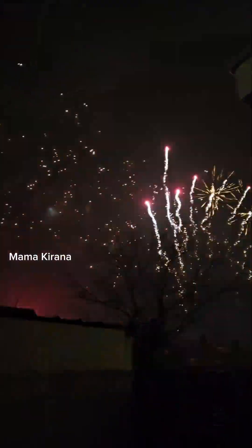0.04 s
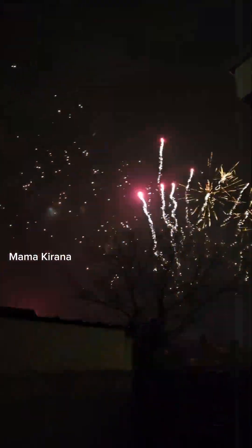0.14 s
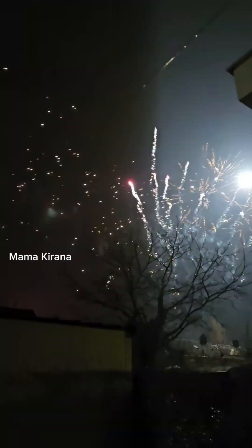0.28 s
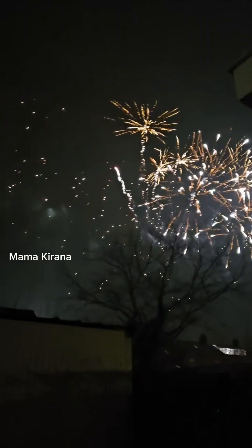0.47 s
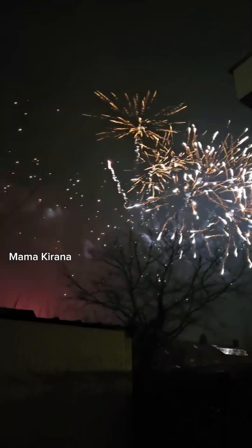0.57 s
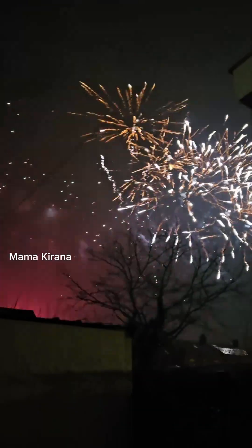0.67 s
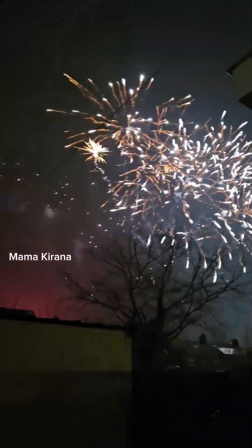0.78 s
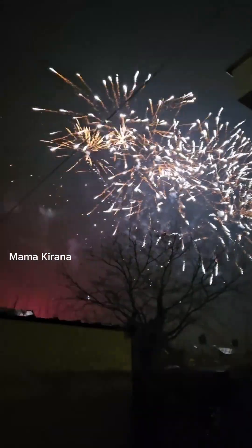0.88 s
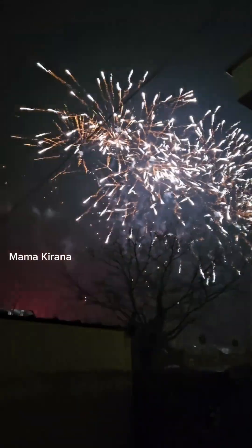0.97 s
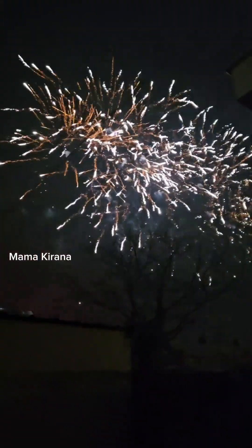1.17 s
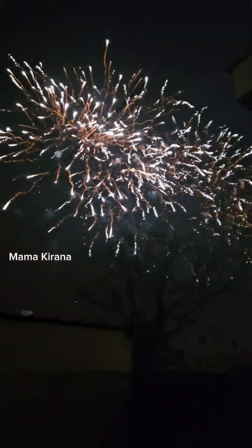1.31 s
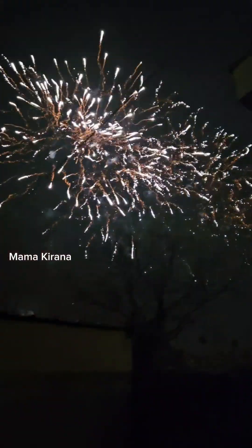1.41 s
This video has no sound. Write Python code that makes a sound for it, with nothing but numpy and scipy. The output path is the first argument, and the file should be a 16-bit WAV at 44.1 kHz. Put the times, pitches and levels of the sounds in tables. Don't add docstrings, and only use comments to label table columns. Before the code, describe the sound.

Fireworks burst over houses at night. An earlier shell's echo rolls over a low distant rumble until about 0.2 s, when sharp bangs with short hissy cracks pile up rapidly to 0.7 s, with low thuds and hard wall slaps. After a brief gap of rolling echo, two more bangs crack near 0.96 and 1.07 s, then the reverberation fades. Stereo phone, peaks softly limited.

```python
import sys
import numpy as np
from scipy import signal
from scipy.fft import rfft, irfft, next_fast_len
from scipy.io import wavfile
from scipy.ndimage import uniform_filter1d, map_coordinates

SR = 44100
rng = np.random.default_rng(int(sys.argv[2]) if len(sys.argv) > 2 else 0)


def ratio_of_db(decibels):
    return 10 ** (np.asarray(decibels, float) / 20)


def wrap_up_sound(samples):
    columns = np.atleast_2d(samples).T
    tamed = np.clip(columns, -1, 1)
    steps = np.round(tamed * 32767).astype(np.int16)
    wavfile.write(sys.argv[1], SR, steps)


N = 63945
LEAD = SR // 2

# start in seconds, blast in dB, blast length in ms, crack in dB, echo in dB.
SHELL_BURSTS = [(-.2, 3.5, 0.77, -18, -5), (0.2046, 3, 0.51, -22.5, 1), (0.2326, 1.5, 0.93, -18.5, -1.5),
                (0.313, -9.5, 0.92, -23, -1.5), (0.3389, 7, 0.35, -17.5, -10.5),
                (0.4285, -5, 1.04, -23, -1.5), (0.5116, -11.5, 0.95, -28, -3),
                (0.5859, -1, 0.99, -12, -3.5), (0.6788, -0.5, 0.84, -17.5, -1.5),
                (0.9604, -1, 0.86, -18.5, -0.5), (1.0714, 1, 0.66, -17, -2), (1.418, -24.5, 1.1, -58.5, 10)]


def shells(mix):
    edge_db = 2.5
    for start_s, blast_db, length_ms, crack_db, echo_db in SHELL_BURSTS:
        add(mix, start_s, blast(blast_db, length_ms) + crack(crack_db + edge_db))
        add(mix, start_s, ratio_of_db(echo_db) * echoes(blast_db, length_ms, crack_db))


def blast(db, length_ms):
    right_late, rise_share, damp_ms = 5, 0.31, 1
    puff_db, puff_ms = -17.5, 1.08
    late = np.array([[0], [right_late]])
    t_ms = np.maximum(np.arange(1024) - late, 0) / SR * 1000
    u = t_ms / abs(length_ms)
    w = t_ms / puff_ms
    swing = 1.56 * np.sin(np.pi * u) * np.exp(-u * damp_ms / abs(length_ms))
    puff = ratio_of_db(puff_db) * (1 - w) * np.exp(-w)
    rise = 1 - np.exp(-(u / rise_share) ** 2)
    return ratio_of_db(db) * (swing + puff) * rise


# frequency in Hz, level in dB per Hz.
CRACK_COLOUR = [(700, -2.5), (1500, 2.5), (3000, -1.5), (5000, 1.5), (8000, -1), (12000, -7.5),
                (16000, -15.5)]


def crack(db, smear=1, dull_hz=40000):
    rise_s, t60_s = 0.00034, 0.0079
    t = np.arange(1024) / SR / smear
    noise = rng.standard_normal((2, len(t)))
    hiss = filtered(noise, lambda hz: ratio_of_db(along(CRACK_COLOUR, hz)) / (1 + (hz / dull_hz) ** 2))
    envelope = ratio_of_db(-60 * t / t60_s) * (1 - np.exp(-t / rise_s))
    return 1.73 * ratio_of_db(db) * hiss / hiss.std() * envelope


# frequency in Hz, t60 in seconds.
SCATTER_T60 = [(100, 0.41), (500, .1), (2000, 0.068), (8000, 0.19)]
# frequency in Hz, t60 in seconds.
ROLL_T60 = [(100, 1.32), (500, 1.15), (2000, 0.33), (5000, 0.57), (12000, 0.47)]
# frequency in Hz, level in dB.
TILE_RATTLE = [(800, -34), (1400, -15), (2200, 5.5), (2700, -23), (4000, -38)]


def echoes(blast_db, length_ms, crack_db):
    scatter_db, roll_db = 2.5, -3.5
    crack_scatter_db, crack_roll_db = -2.5, -6.5
    rattle_db = -0.5
    near = tail(SCATTER_T60, delay_s=0.002, hold_s=0.02, n=SR // 4)
    street = tail(ROLL_T60, delay_s=0.042, hold_s=0, n=SR)
    dull = ratio_of_db(scatter_db) * near + ratio_of_db(roll_db) * street
    bright = ratio_of_db(crack_scatter_db) * near + ratio_of_db(crack_roll_db) * street
    boom = signal.fftconvolve(blast(blast_db, length_ms), dull, axes=1)[:, :SR]
    hiss = filtered(bright, lambda hz: 20 * ratio_of_db(crack_db + along(CRACK_COLOUR, hz)))
    rattle = filtered(near, lambda hz: ratio_of_db(blast_db + rattle_db + along(TILE_RATTLE, hz)))
    return boom + hiss + rattle


# frequency in Hz, level in dB.
WALL_COLOUR = [(60, 10), (250, 1.5), (550, 3), (900, -4.5), (1400, 8.5), (3000, 3), (6000, 2.5),
               (15000, -0.5)]


def tail(t60s, delay_s, hold_s, n):
    clumps_db = 1.58
    hz, t, z = signal.stft(stereo_noise(n, WALL_COLOUR), SR, nperseg=256)
    clumps = uniform_filter1d(rng.standard_normal(z.shape[1:]), size=25, axis=0) * 5
    fall_db = -60 * np.maximum(t - hold_s, 0) / np.maximum(along(t60s, hz), .02)[:, None]
    x = signal.istft(z * ratio_of_db(fall_db + clumps_db * clumps), SR, nperseg=256)[1][:, :n]
    x = x * (1 - np.exp(-(np.arange(n) / SR / delay_s) ** 2))
    energy = np.sum(x ** 2, 1)
    return np.pad(x, ((0, 0), (0, SR - n))) / np.sqrt(np.mean(energy))


# start in seconds, blast in dB, blast length in ms, crack in dB, left over right in dB.
PRESSURE_SLAPS = [(0.2204, -2, .4, -18, 2), (0.4312, -6, 0.81, -21, -19), (.436, -2, 0.52, -22, -12),
                  (.521, -15, 1.3, -25, 7.5), (.592, -10, 0.79, -33, -23), (0.603, -5, 0.78, -23, 3),
                  (.613, 6, 0.66, -15, 1.5), (0.751, -45, 1.8, -41, 0), (1.033, -8, 1.7, -70, 3),
                  (1.135, -25, 0.91, -27, 10), (1.146, -9, 1.55, -30.5, 3.5)]
# start in seconds, blast in dB, blast length in ms, crack in dB, left over right in dB.
SUCTION_SLAPS = [
    (.2465, -11, 0.88, -17.5, 4),
    (0.291, -7, 1.63, -20.5, 1),
    (0.446, -15, 1.44, -23, 0),
    (.627, -11.5, 1.7, -23, 1),
    (0.6931, -10.5, 1.1, -36, -4),
]


def wall_slaps(mix):
    for sign, table in ((0.45, PRESSURE_SLAPS), (-1.18, SUCTION_SLAPS)):
        for start_s, blast_db, length_ms, crack_db, pan_db in table:
            pan = ratio_of_db(np.array([[pan_db / 2], [-pan_db / 2]]))
            slap = sign * blast(blast_db, length_ms) + crack(crack_db, smear=1.82, dull_hz=8800)
            add(mix, start_s, slap * pan)


# start in seconds, level in dB, pitch in Hz, t60 in seconds.
THUD_HITS = [
    (0.3, -15, 86, 0.047),
    (0.53, 3, 60, 0.037),
    (0.74, -10, 49, 0.14),
    (0.21, -18.5, 246, 0.087),
    (.234, -16.5, 242, 0.085),
    (.52, -23, 185, 0.077),
    (.4283, -11.5, 513, 0.025),
    (0.962, -15.5, 230, 0.038),
    (1.074, -19, 480, 0.034),
]


def thuds(mix):
    t = np.arange(SR // 5) / SR
    for start_s, db, hz, t60_s in THUD_HITS:
        decay = ratio_of_db(db - 60 * t / t60_s)
        ring = (1 - np.exp(-hz * t)) * np.sin(2 * np.pi * hz * t)
        add(mix, start_s, 4 * (decay * ring)[None])


# time in seconds, level in dB.
FAR_SWELL = [
    (0, -23.5),
    (.1, -23.5),
    (.19, -25.5),
    (0.298, -24),
    (.47, -21.5),
    (.8, -26),
    (.95, -27.5),
    (1.2, -30),
    (1.36, -28),
    (1.45, -30.5),
]
# frequency in Hz, level in dB per Hz.
RUMBLE_COLOUR = [(30, 7), (55, 15), (120, -10.5), (250, -1), (600, -14.5), (900, -20.5), (1300, -15),
                 (3000, -29), (8000, -51)]


def far_fireworks():
    s, level_db = np.transpose(FAR_SWELL)
    noise = stereo_noise(N, RUMBLE_COLOUR + [(12000, -120)])
    lumps_db = .8 * wobble(45)
    swell_db = 1 + np.interp(np.arange(N) / SR, s, level_db)
    return noise / noise.std() * ratio_of_db(swell_db + lumps_db)


def wobble(rate):
    knots = rng.standard_normal(N // 500 + 4)
    return map_coordinates(knots, [np.arange(N) * rate / SR])


# frequency in Hz, left-right likeness from 0 to 1.
LIKENESS = [(40, 0.97), (120, 1), (250, 0.9), (600, 0.57), (1200, 0.018), (8000, 0.032)]


def stereo_noise(n, colour):
    def middle_and_side(hz):
        turn = np.arccos(np.clip(along(LIKENESS, hz), -1, 1)) / 2
        return ratio_of_db(along(colour, hz)) * np.array([np.cos(turn), np.sin(turn)])
    middle, side = filtered(rng.standard_normal((2, n)), middle_and_side)
    return np.array([middle + side, middle - side])


def along(points, hz):
    f, v = np.transpose(points)
    return np.interp(np.log(hz + 1), np.log(f + 1), v)


def filtered(x, response):
    n = x.shape[-1]
    m = next_fast_len(n + 8192)
    return irfft(rfft(x, m) * response(np.fft.rfftfreq(m, 1 / SR)), m)[..., :n]


def add(mix, start_s, x):
    part = mix[:, round(start_s * SR) + LEAD:][:, :x.shape[1]]
    part += x[:, :part.shape[1]]


def scene():
    mix = np.zeros((2, N + LEAD))
    shells(mix)
    wall_slaps(mix)
    thuds(mix)
    return mix[:, LEAD:] + far_fireworks()


# frequency in Hz, left over right in dB.
PORT_TILT = [(60, -1), (180, 2), (550, 2), (1650, -0.5), (4970, 3.0), (15000, 3.5)]


def band_limit(x):
    return signal.sosfilt(signal.butter(12, 16990, fs=SR, output="sos"), x)


def record(dry):
    cut_hz, cut_width = 156, 0.83
    top_hz, top_db = 16000, -16
    ceiling, knee = 1.0, 8

    def microphones(f):
        low_cut = -f * f / (cut_hz ** 2 - f * f + 1j * f * cut_hz * cut_width)
        tilt_db = np.outer([.5, -.5], along(PORT_TILT, f))
        return low_cut * ratio_of_db(tilt_db + top_db * (f > top_hz))
    x = filtered(dry, microphones)
    limited = x / (1 + np.abs(x / ceiling) ** knee) ** (1 / knee)
    return band_limit(limited)


dry = scene()
out = record(dry)
wrap_up_sound(out)
```